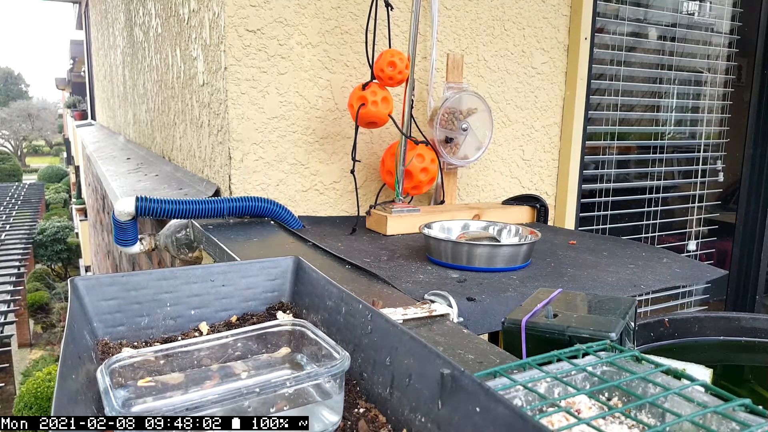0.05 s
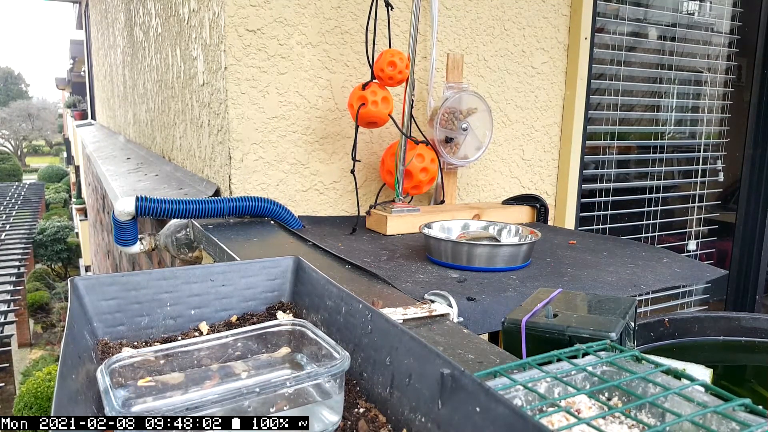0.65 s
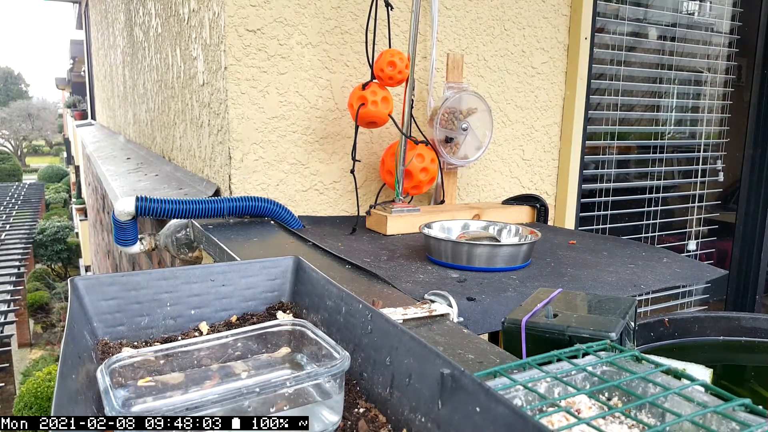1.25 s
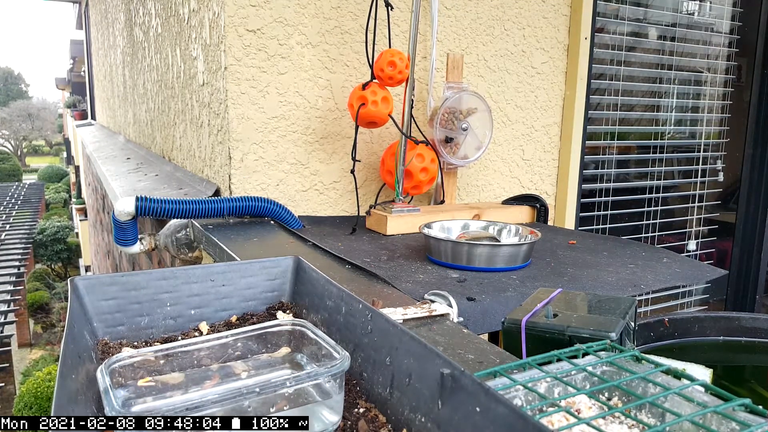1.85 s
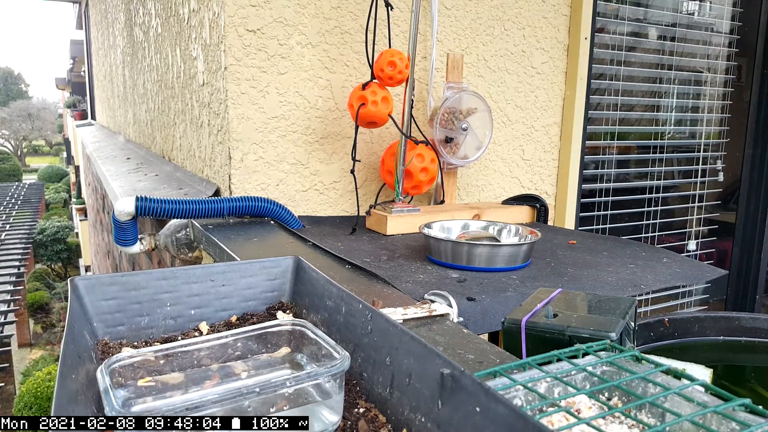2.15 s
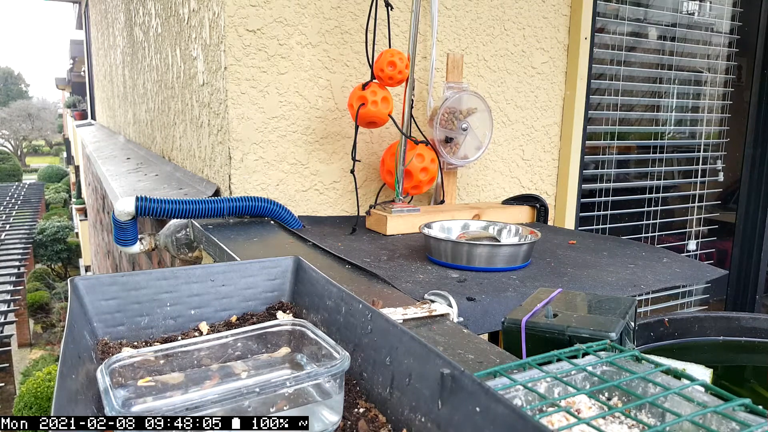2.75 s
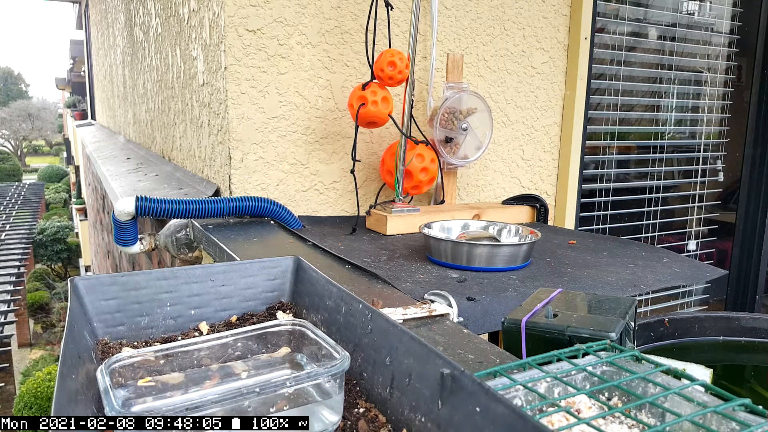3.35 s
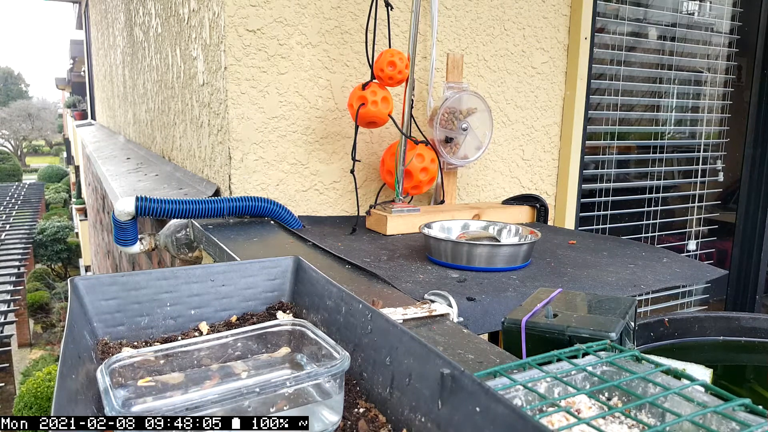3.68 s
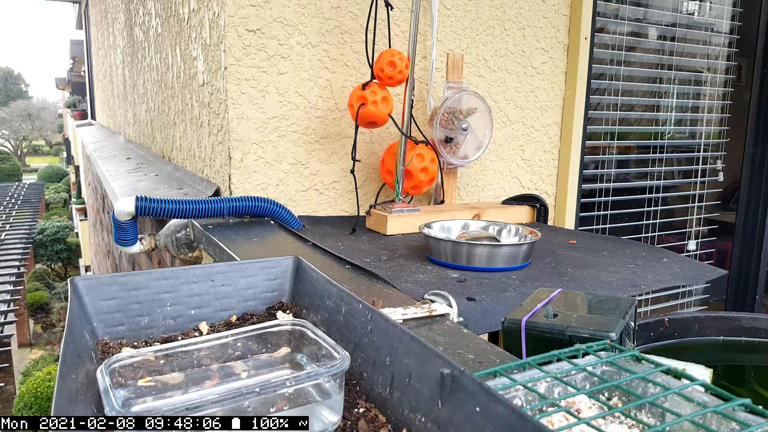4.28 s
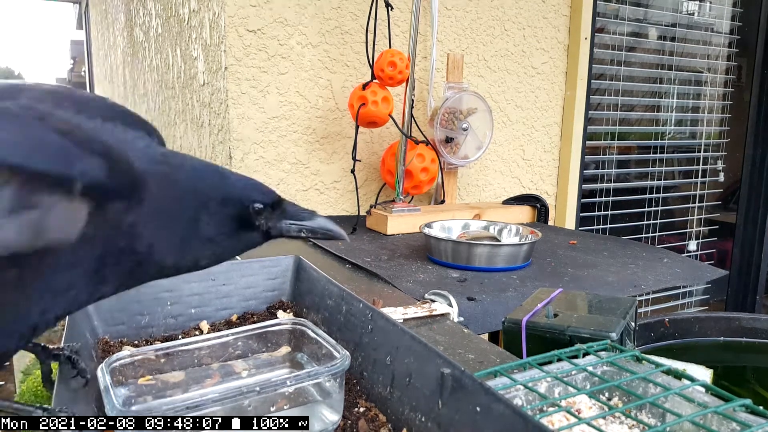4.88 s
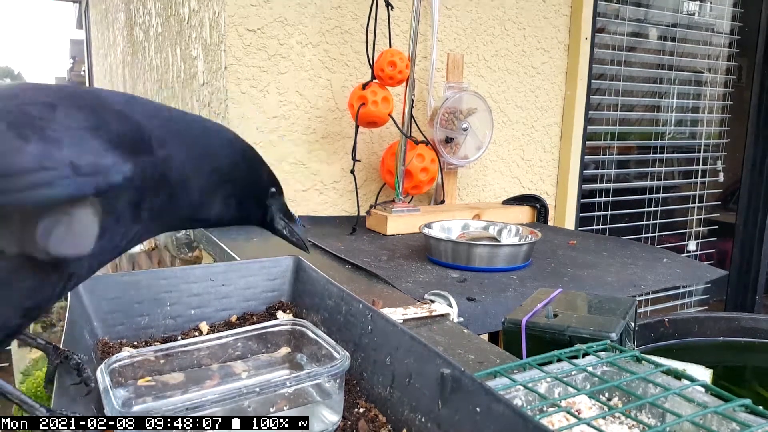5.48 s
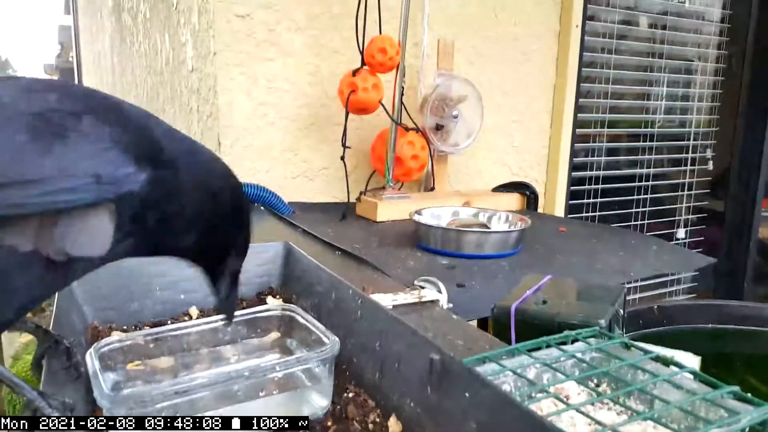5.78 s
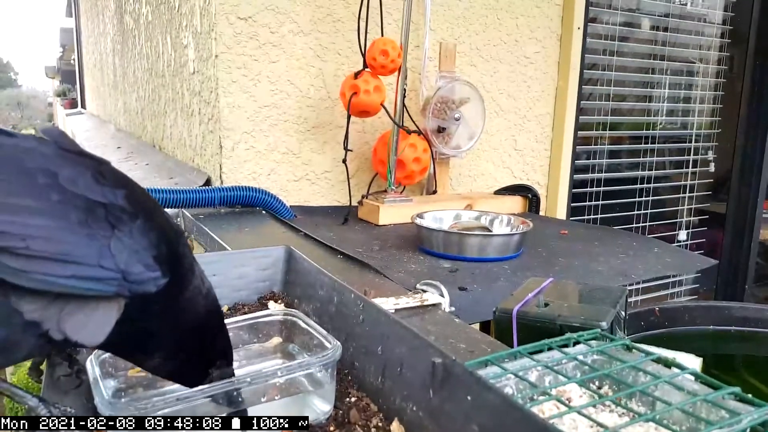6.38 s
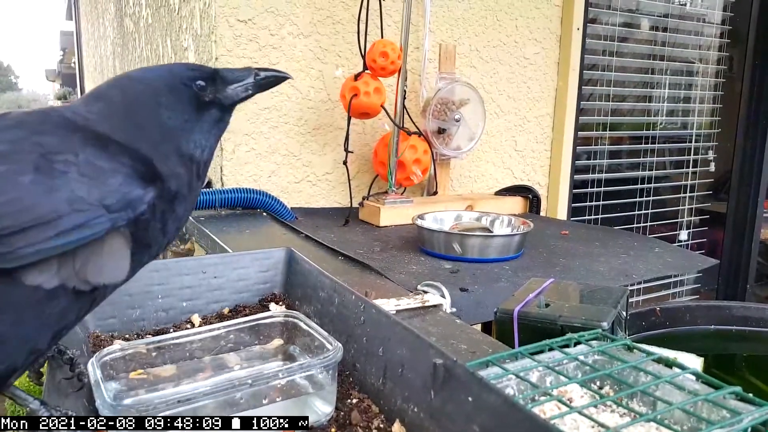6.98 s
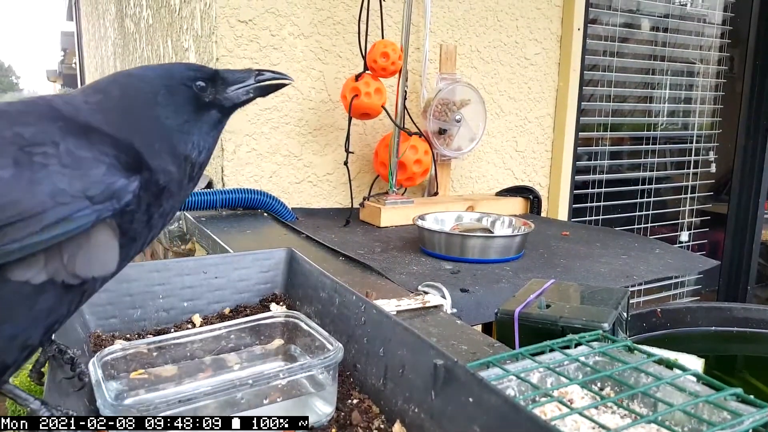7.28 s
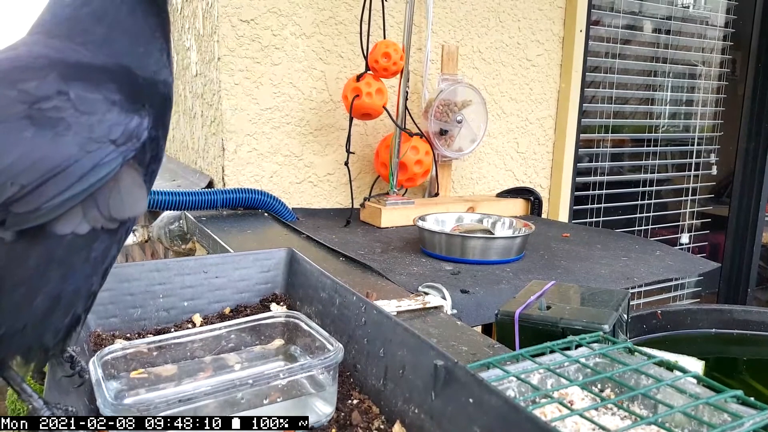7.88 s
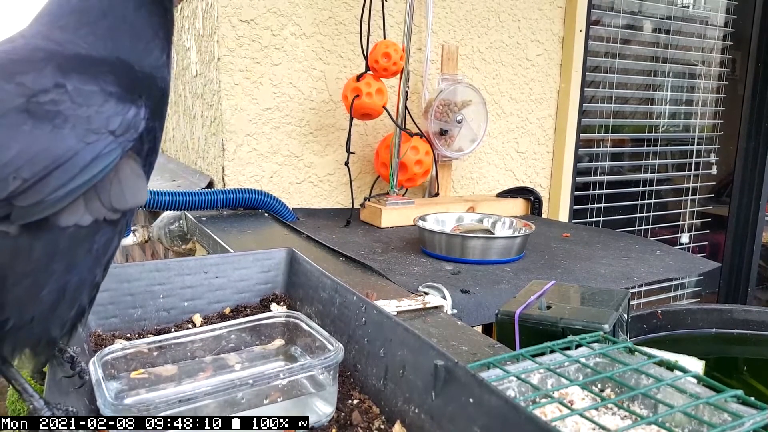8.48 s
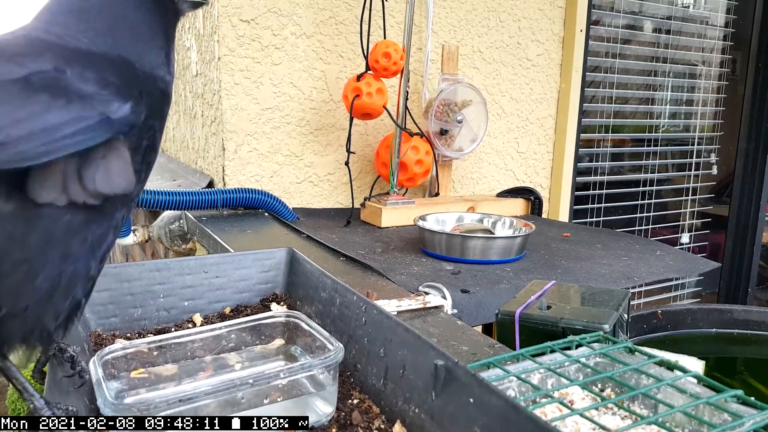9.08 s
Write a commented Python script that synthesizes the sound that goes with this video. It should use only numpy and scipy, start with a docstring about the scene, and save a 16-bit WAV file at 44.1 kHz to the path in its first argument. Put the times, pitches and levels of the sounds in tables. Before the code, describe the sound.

A small bird whistles faintly between buildings over a low traffic roar and humming machinery. Close by on the balcony, soft wingbeats end in a thump and claw ticks as a crow lands on a plastic planter. It clacks hard against a glass dish, making the volume dip briefly, then taps lightly and shuffles its feathers. A quick phrase of birdsong follows. The sound stutters now and then with runs of tiny gaps.

```python
"""A crow flaps onto a plastic planter on a city balcony and pecks at a glass dish standing in it.
Its feet make the planter thud, its beak makes the dish clack, its claws tick and its feathers rustle.
Further off, a small bird whistles between the buildings, over traffic and a machine's hum.
An automatic volume control turns everything down after the hardest knock, and the sound cuts out
in runs of short gaps, about six a second."""
import sys
import numpy as np
from scipy import signal
from scipy.fft import rfft, irfft, next_fast_len
from scipy.io import wavfile
from scipy.ndimage import map_coordinates

SR = 44100
rng = np.random.default_rng(int(sys.argv[2]) if len(sys.argv) > 2 else 0)


def generate_wav(signal):
    """Clip the signal to [-1, 1] and save it as 16-bit WAV at the path in sys.argv[1]."""
    frames = np.transpose(np.atleast_2d(signal))
    scaled = np.clip(frames, -1, 1) * 32767
    pcm = np.round(scaled).astype(np.int16)
    wavfile.write(sys.argv[1], SR, pcm)


N = 403074

# feet landing or pushing on the planter's rim: (time [s], thud level [dB], contact time [s])
FOOTSTEPS = [(4.672, -13.5, .0009), (4.687, -20, 0.0039), (5.168, -32.5, .0006), (5.18, -31.5, .0005),
             (5.5082, 1.5, .0067)]
# sharp ticks of the claws and the tip of the beak: (time [s], level [dB])
CLAW_TICKS = [(4.668, -11.5), (4.678, -20), (4.683, -30), (4.699, -31.5), (4.8435, -37.5), (5.2573, -45),
              (5.2812, -43.5), (5.4685, -36), (5.526, -13.5), (5.657, -45), (5.677, -34), (5.7325, -34)]
# knocks on the dish, which shake the planter too: (time [s], clack level [dB], thud level [dB])
DISH_KNOCKS = [(4.677, -19.5, -29), (5.4934, -10, -2), (5.5002, 13.5, -4), (5.511, 0.5, 3),
               (5.532, 3, -9.5), (5.583, -17.5, -13), (5.6646, -18, -23), (5.729, -8, -19),
               (5.7975, -35, -47), (5.8494, -21, -35), (6.175, -35.5, -41), (6.888, -34.5, -31.5),
               (7.539, -37.5, -50)]
# claws skid, or the dish drags over the soil: (time [s], length [s], starting level [dB])
SKIDS = [(4.66, 0.057, -33), (5.503, .06, -3), (5.569, 0.12, -23.5), (5.738, 0.02994, -27.5),
         (5.837, 0.028, -30.5)]
# tones of the planter's walls: (pitch [Hz], relative level [dB], time to fade by 60 dB [s])
PLANTER_TONES = [(80, -6.5, 0.12), (149.2, -2, 0.1), (200.6, 2.5, 0.063), (262, -4, 0.17),
                 (332.5, -10.5, 0.079), (396, -9.5, 0.037)]
# tones of the dish on its bed of soil: (pitch [Hz], relative level [dB], time to fade by 60 dB [s])
DISH_TONES = [(494, -4, 0.17), (620, -10.5, .1), (740, 2, 0.051), (829, -1.5, 0.082), (956, -7.5, 0.09),
              (1121, -12, 0.061), (1263, -11, 0.038), (1353, -12.5, 0.056), (1364, -8.5, .12),
              (1710, -4, 0.017), (2057, -0.5, 0.024), (1942, -1, 0.032), (2280, -14, 0.034),
              (3780, -13, .025), (3990, -18.5, .025), (5315, -14, 0.02)]
# the crack of each hit: (frequency [Hz], relative level [dB])
CRACK_SPECTRUM = [(200, 6.5), (750, 0), (1380, 4.5), (1650, -6.5), (1950, 3.5), (2300, -2.5), (2800, -13.5),
                  (3900, -15), (5300, -15), (6000, -23.5), (16000, -33)]
# beak and claws scratching hard edges: (frequency [Hz], relative level [dB])
SCRATCH_SPECTRUM = [(1000, -22), (3800, -16), (5000, -6), (5700, -15), (8000, -13), (9000, 0), (11000, -5),
                    (12500, -5), (15000, 3), (16500, -4)]
# feathers brushing each other: (frequency [Hz], relative level [dB])
FEATHER_SPECTRUM = [(1000, -10), (3800, -6), (5200, -0.5), (7500, -7.5), (9000, 0), (12500, -3.5),
                    (15000, -4), (16500, -15.5)]
# the perched crow shifts its feathers: (middle time [s], half width [s], level [dB])
FEATHER_SHUFFLES = [(4.87, 0.11, -72.5), (5.32, 0.43, -67), (5.73, .12, -65), (6.315, 0.026, -63),
                    (7.41, 0.068, -69), (7.54, 0.054, -68), (8.36, 0.087, -73), (9.08, .05, -67)]
# the small bird's sliding notes: (time [s], length [s], start pitch [Hz], end pitch [Hz], level [dB])
BIRD_NOTES = [(0, 0.054, 2950, 2770, -56.5), (1.055, .07, 4680, 4470, -74), (4.063, 0.27, 4650, 4540, -77),
              (5.467, .03, 3520, 3840, -50), (5.569, .08, 5250, 3730, -48), (6.332, .56, 6340, 5300, -77),
              (6.969, .013, 4200, 4020, -63.5), (7.795, 0.029, 2730, 2920, -55.5),
              (7.864, 0.055, 3130, 3790, -51.5), (7.996, 0.053, 3650, 3600, -56.5),
              (8.032, .04, 5300, 5090, -57), (8.063, .03, 4700, 4900, -51.5),
              (8.087, .072, 4790, 3630, -49.5), (8.237, 0.035, 3135, 3050, -60)]
# its short falling chirps: (time [s], level [dB])
BIRD_CHIRPS = [(.076, -66), (.111, -63), (3.074, -75), (3.683, -61.5)]
# its one long rising note: (time [s], pitch [Hz])
RISING_NOTE = [(3.16, 2056), (3.301, 2080), (3.429, 2250), (3.53, 2740), (3.67, 3220)]
# the roar of far traffic: (frequency [Hz], relative level [dB])
TRAFFIC_SPECTRUM = [(25, -17), (58, -11), (85, -2.5), (140, 0.5), (180, -4.5), (215, -6), (320, -7.5),
                    (450, -12), (850, -11), (1400, -14.5), (1800, -22), (2250, -23), (2850, -37.5),
                    (4600, -43.5), (7000, -65.5)]
# how that roar swells and sinks: (time [s], level change [dB])
TRAFFIC_SWELL = [(0, -1.2), (1.8, -0.8), (3.1, -2), (4.2, -1.5), (6.1, -.5), (9.1, -2)]
# tyre hiss of the nearer cars: (frequency [Hz], relative level [dB])
TYRE_SPECTRUM = [(700, -12), (1400, -3.5), (2150, 5), (2450, -4), (2900, -23.5), (5000, -34), (7000, -46)]
# surges of that hiss as cars pass: (middle time [s], half width [s], level [dB])
PASSING_CARS = [(0, 0.17, -60), (.55, 0.2, -58), (1.75, 0.21, -58.5), (5.1, 0.59, -64), (7.5, 0.45, -63),
                (8.05, 0.34, -64), (9.0, 0.32, -60.5)]
# the hum of a building's machinery: (pitch [Hz], level [dB])
HUM_TONES = [(118.4, -52.5), (156.1, -47)]
# how long the balcony echoes: (frequency [Hz], time to fade by 60 dB [s])
BALCONY_ECHO = [(100, 0.22), (1400, 0.45), (4000, 0.11), (14000, 0.31)]
# the microphone's own hiss: (frequency [Hz], relative level [dB])
HISS_SPECTRUM = [(2000, -3.5), (5500, -0.5), (7500, -4), (11000, -0.5), (15400, 3.5), (16100, -14)]
# moments when the sound cuts out: (start time [s], end time [s], short gaps that follow [count])
CUTOUTS = [(.017, .037, 0), (.176, .216, 7), (1.475, 1.514, 7), (2.772, 2.811, 5), (3.914, 3.935, 0),
           (4.074, 4.11, 7), (5.372, 5.408, 7), (6.666, 6.708, 0), (6.848, 6.88, 0), (6.996, 7.04, 0),
           (7.157, 7.202, 0), (7.912, 8.018, 7)]


def crow_hits():
    """The crow's steps mostly thud, its claws mostly tick, and its pecks on the dish mostly clack."""
    out = np.zeros(N)
    for s, db, contact_s in FOOTSTEPS:
        add(out, s, hit(thud_db=db, clack_db=db - 17, tick_db=db - 26.5, contact_s=contact_s))
    for s, db in CLAW_TICKS:
        add(out, s, hit(thud_db=db - 20.5, clack_db=db - 8.5, tick_db=db))
    for s, db, thud_db in DISH_KNOCKS:
        add(out, s, hit(thud_db=thud_db, clack_db=db, tick_db=db - 21.5))
    return out


def crow_scrapes(spacing_s=0.0055, fade_db=11.5, scatter_db=3):
    """A claw or the dish sticks and slips, making an uneven run of small hits that die away."""
    out = np.zeros(N)
    for s, length, first_db in SKIDS:
        for after in np.arange(0, length, spacing_s):
            db = first_db - fade_db * after / length + scatter_db * rng.standard_normal()
            slip_s = s + after + spacing_s * rng.random()
            add(out, slip_s, hit(thud_db=db - 3, clack_db=db, tick_db=db - 19.5, contact_s=0.0025))
    return out


def hit(thud_db, clack_db, tick_db, contact_s=0.002):
    """One hit makes the planter thud, the dish ring with a crack, and a hard edge tick."""
    t = np.arange(SR // 4) / SR
    thud = ring(PLANTER_TONES, t, contact_s)
    glass = ring(DISH_TONES, t, contact_s=0)
    crack = burst(CRACK_SPECTRUM, t, rise_s=0.00035, fall_s=0.0033)
    clack = gain_of(-7) * glass + gain_of(-3) * crack
    tick = burst(SCRATCH_SPECTRUM, t, rise_s=0.0008, fall_s=0.0009) / np.sqrt(2)
    return gain_of(thud_db) * thud + gain_of(clack_db) * clack + gain_of(tick_db) * tick


def ring(tones, t, contact_s):
    """A struck object rings with its own fading tones; a long, soft contact wakes only the low ones."""
    hz, db, fade_s = np.transpose(tones)[:, :, None]
    strength = gain_of(db + rng.standard_normal(db.shape))  # no two hits land quite alike
    strength /= (1 + (hz * contact_s) ** 2) ** 2
    sign = (-1) ** np.arange(len(tones))[:, None]  # every other tone starts the opposite way
    fade = np.exp(-np.log(1000) * t / fade_s)
    return (sign * strength * fade * np.sin(2 * np.pi * hz * t)).sum(0) / np.linalg.norm(strength)


def burst(spectrum, t, rise_s, fall_s):
    """Two surfaces meet with a short puff of noise."""
    shape = (1 - np.exp(-t / rise_s)) * np.exp(-t / fall_s)
    return coloured(rng.standard_normal(len(t)), spectrum) * shape / shape.max()


def crow_feathers(grain_db=2, flutter_db=1):
    """With each wingbeat or shuffle, feathers slide over each other in countless tiny catches."""
    catches = rng.standard_normal(N) * gain_of(grain_db * wobble(620, N) + flutter_db * wobble(28, N))
    return swells(wingbeats() + FEATHER_SHUFFLES) * coloured(catches, FEATHER_SPECTRUM)


def wingbeats(count=4, first_s=4.17, spacing_s=0.185, half_width_s=0.064, first_db=-67, step_db=4.4):
    """Evenly timed braking flaps, each a louder swell than the last as the crow comes closer."""
    return [(first_s + k * spacing_s, half_width_s, first_db + k * step_db) for k in range(count)]


def songbird():
    """A small bird sings sliding notes, short falling chirps and one long rising note."""
    out = np.zeros(N)
    for s, length, start_hz, end_hz, db in BIRD_NOTES:
        add(out, s, whistle(slide(length, start_hz, end_hz), db))
    for s, db in BIRD_CHIRPS:
        add(out, s, whistle(slide(length_s=0.031, start_hz=4160, end_hz=3370), db))
    times, hz = np.transpose(RISING_NOTE)
    rising_hz = np.interp(np.arange(times[0], times[-1], 1 / SR), times, hz)
    add(out, times[0], whistle(rising_hz, db=-61.5))
    return out


def whistle(hz, db, waver=0.022, flutter_db=3, brightest_db=-46):
    """A whistle with a quick, raspy waver; louder notes carry more overtones and sound brighter."""
    wavering_hz = hz * (1 + waver * wobble(600, len(hz)))
    phase = 2 * np.pi * np.cumsum(wavering_hz) / SR
    overtones = gain_of(-14) * np.sin(2 * phase) + gain_of(-21) * np.sin(3 * phase)
    note = np.sin(phase) + min(gain_of(db - brightest_db), 1) * overtones
    loudness = gain_of(db + flutter_db * wobble(120, len(hz)))
    return loudness * note * signal.windows.tukey(len(hz), 0.5)


def slide(length_s, start_hz, end_hz):
    """A pitch that moves quickly at first, then settles on its last note."""
    return end_hz + (start_hz - end_hz) * np.linspace(1, 0, int(length_s * SR)) ** 1.5


def far_birds(per_s=40, centre_hz=4300, spread_hz=500):
    """Birds in the trees below give faint sliding chirps at random moments."""
    out, t = np.zeros(N), np.arange(SR // 25) / SR
    for s in np.flatnonzero(rng.random(N) < per_s / SR) / SR:
        pitch, bend, strength = rng.standard_normal(3)
        start_hz = centre_hz + spread_hz * pitch
        chirp = signal.chirp(t, start_hz, t[-1], start_hz + spread_hz * bend)
        add(out, s, gain_of(-79 + 2 * strength) * chirp * np.hanning(len(t)))
    return out


def traffic(level_db=-46, flutter_db=1.39):
    """Many far cars blend into one low roar that slowly swells and sinks."""
    roar = coloured(rng.standard_normal(N), TRAFFIC_SPECTRUM)
    swell_db = np.interp(np.arange(N) / SR, *np.transpose(TRAFFIC_SWELL))
    return roar * gain_of(level_db + swell_db + flutter_db * wobble(14, N))


def machine_hum(drift_hz=0.907, throb_db=1):
    """A building's machinery hums two low tones that waver in pitch and strength."""
    out = np.zeros(N)
    for hz, db in HUM_TONES:
        phase = 2 * np.pi * np.cumsum(hz + drift_hz * wobble(7, N)) / SR
        out += np.sqrt(2) * gain_of(db + throb_db * wobble(2, N)) * np.sin(phase)
    return out


def tyres(far_db=-68.5, flutter_db=3.6):
    """A brighter hiss of tyres rises whenever a car runs closer."""
    nearness = np.hypot(gain_of(far_db), swells(PASSING_CARS))
    hiss = coloured(rng.standard_normal(N), TYRE_SPECTRUM)
    return hiss * nearness * gain_of(flutter_db * wobble(25, N))


def echoes(x, fade_times, delay_s):
    """Sound bounces off the walls many times, each frequency fading at its own speed."""
    bounces = rng.standard_normal(SR) * (rng.random(SR) < 0.1) * (np.arange(SR) > delay_s * SR)
    hz, t, bands = signal.stft(bounces, SR, nperseg=256)
    fade = np.exp(-np.log(1000) * t / look_up(fade_times, hz)[:, None])
    tail = signal.istft(bands * fade, SR, nperseg=256)[1]
    return signal.oaconvolve(x, tail / np.linalg.norm(tail))[:N]


def volume_control(x, limit_db=-15, share=0.84, attack_s=0.012, recover_s=0.82):
    """Turns the volume down quickly when the sound is too loud, then lets it creep back."""
    keep = np.exp(-1 / (attack_s * SR))
    power_db = 10 * np.log10(signal.lfilter([1 - keep], [1, -keep], x ** 2) + 1e-12)
    over_db = np.maximum(power_db - limit_db, 1e-6)
    age = np.arange(N) / SR / recover_s
    held_db = np.exp(np.maximum.accumulate(np.log(over_db) + age) - age)  # each peak fades slowly
    return x * gain_of(-share * held_db)


def dropouts(spacing_s=0.16, gap_s=0.02):
    """1 while sound gets through; 0 in each cutout and in any evenly spaced gaps after it."""
    passed = np.ones(N)
    for start, resume, gaps in CUTOUTS:
        gap_ends = resume + spacing_s * np.arange(1, gaps + 1)
        for off_s, on_s in [(start, resume)] + [(end - gap_s, end) for end in gap_ends]:
            passed[round(off_s * SR):round(on_s * SR)] = 0
    return passed


def gain_of(db):
    """Turns decibels into a number to multiply a sound by."""
    return 10 ** (np.asarray(db) / 20)


def look_up(points, hz):
    """Reads a table at any frequency, joining its rows by straight lines on a musical pitch scale."""
    known_hz, values = np.transpose(points)
    return np.interp(np.log(hz + 1), np.log(known_hz + 1), values)


def add(mix, s, sound):
    """Mixes a sound in, starting at s seconds."""
    part = mix[max(round(s * SR), 0):][:len(sound)]
    part += sound[:len(part)]


def coloured(x, spectrum):
    """Shapes the lows and highs of x to follow a spectrum, then sets its average power to 1."""
    size = next_fast_len(len(x))
    gains = gain_of(look_up(spectrum, np.fft.rfftfreq(size, 1 / SR)))
    shaped = irfft(rfft(x, size) * gains, size)[:len(x)]
    return shaped / np.sqrt(np.mean(shaped ** 2) + 1e-20)


def wobble(per_s, size):
    """A smooth random curve, mostly between -1 and 1, that takes per_s new values a second."""
    points = rng.standard_normal(4096)
    return map_coordinates(points, [np.arange(size) * per_s / SR], order=2, mode="wrap")


def swells(rows):
    """A loudness curve of bell-shaped bumps: (middle time [s], half width [s], level [dB])."""
    t = np.arange(N) / SR
    return np.sqrt(sum((gain_of(db) * np.exp(-((t - s) / width) ** 2)) ** 2 for s, width, db in rows))


def scene(bass_cut_hz=62, wall_delay_s=0.034):
    """The crow is close, with little echo; the small birds echo between the buildings."""
    # the crow's hits and scrapes carry no deep bass
    bass_cut = signal.butter(2, bass_cut_hz, "highpass", fs=SR, output="sos")
    crow = signal.sosfilt(bass_cut, crow_hits() + crow_scrapes()) + crow_feathers()
    song = songbird()
    near = crow + gain_of(-27.5) * echoes(crow, BALCONY_ECHO, delay_s=0.004)
    # only the echo of the far birds is heard; every frequency takes 0.49 s to fade
    far = song + gain_of(-4.5) * echoes(song + far_birds(), [(3500, 0.49)], delay_s=0.0039)
    add(far, wall_delay_s, gain_of(-15) * song)  # a building's front repeats each note
    return (near + far + traffic() + machine_hum() + tyres())[None]


def record(dry, hiss_db=-77, ceiling=0.75, treble_cut_hz=16450):
    """Adds microphone hiss, turns down and squashes loud peaks, cuts gaps and trims the top treble."""
    hiss = gain_of(hiss_db) * coloured(rng.standard_normal(N), HISS_SPECTRUM)
    controlled = volume_control(dry[0] + hiss)
    squashed = ceiling * np.tanh(controlled / ceiling)
    treble_cut = signal.firwin(255, treble_cut_hz, window=("kaiser", 9), fs=SR)
    return signal.oaconvolve(squashed * dropouts(), treble_cut, "same")[None]


dry = scene()
out = record(dry)
generate_wav(out)
```